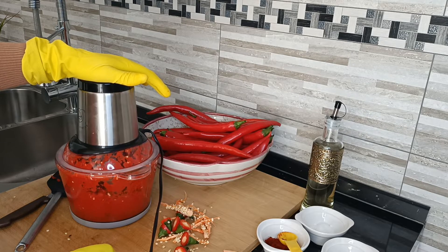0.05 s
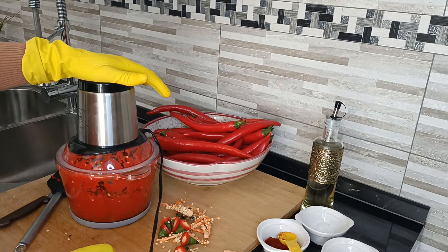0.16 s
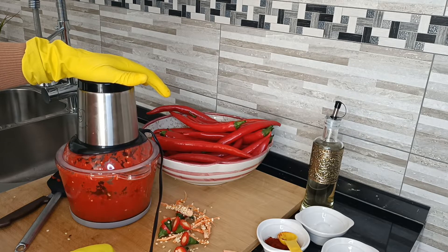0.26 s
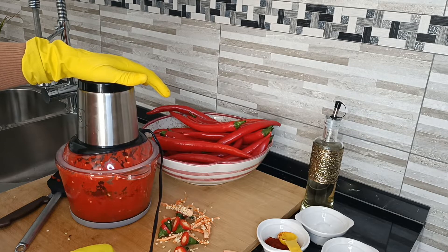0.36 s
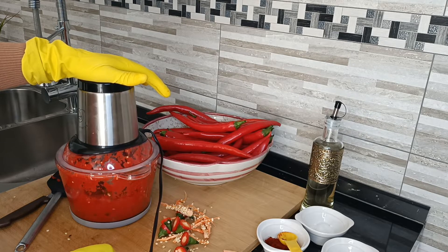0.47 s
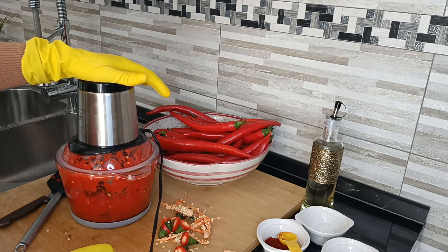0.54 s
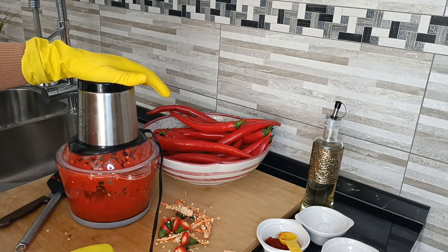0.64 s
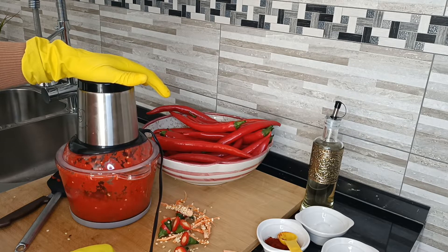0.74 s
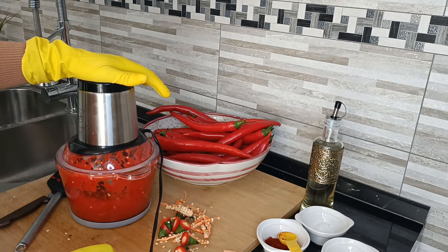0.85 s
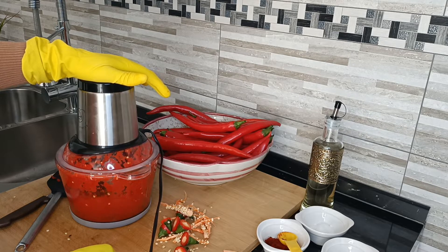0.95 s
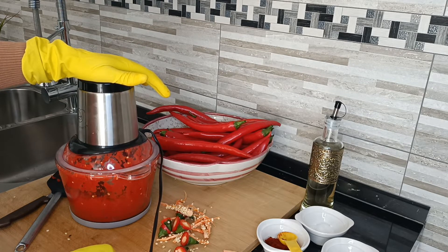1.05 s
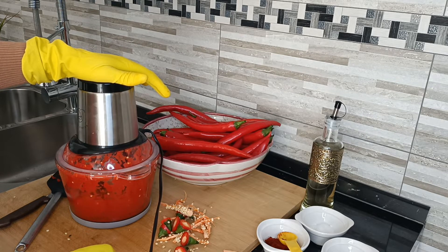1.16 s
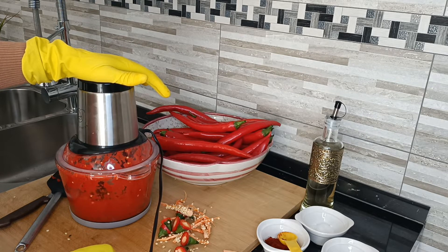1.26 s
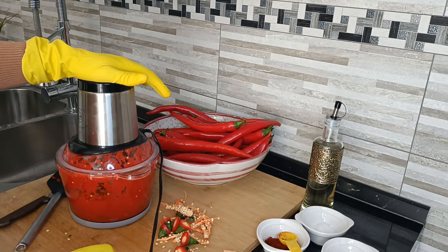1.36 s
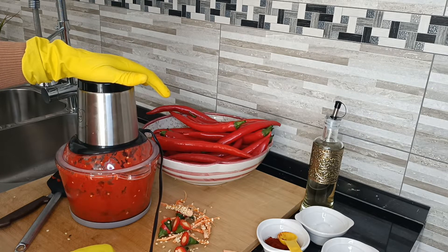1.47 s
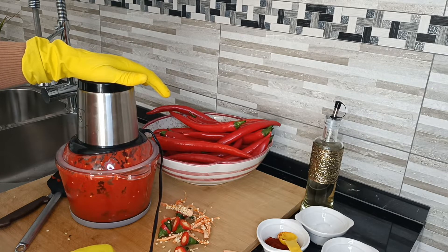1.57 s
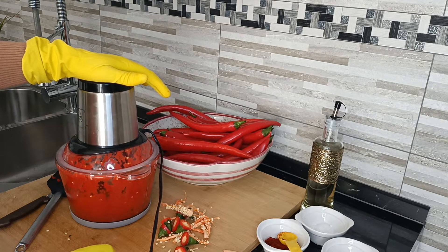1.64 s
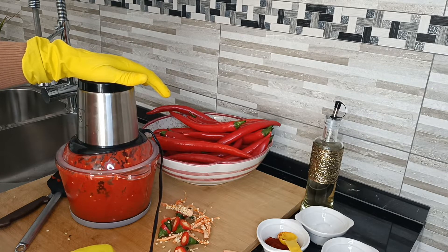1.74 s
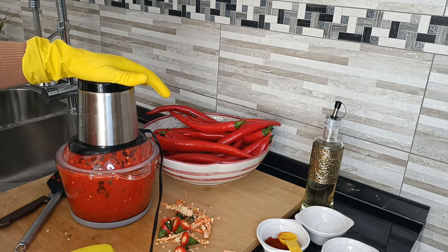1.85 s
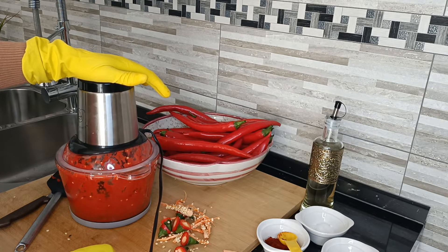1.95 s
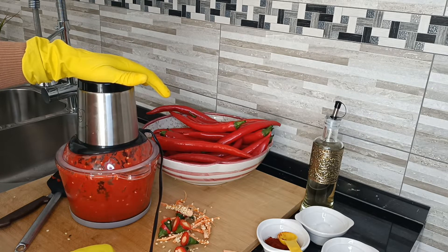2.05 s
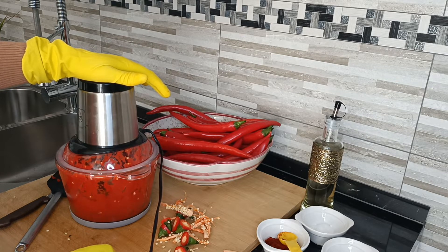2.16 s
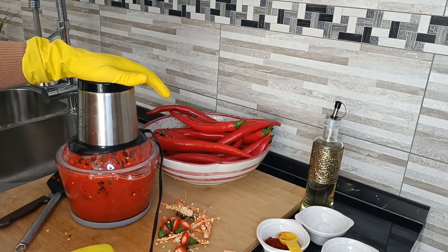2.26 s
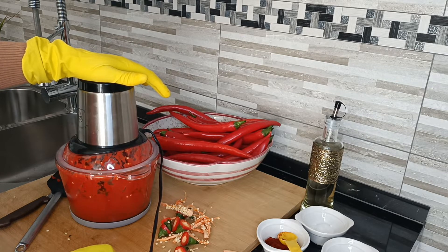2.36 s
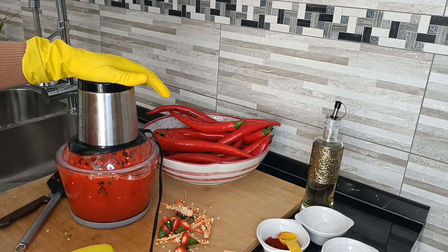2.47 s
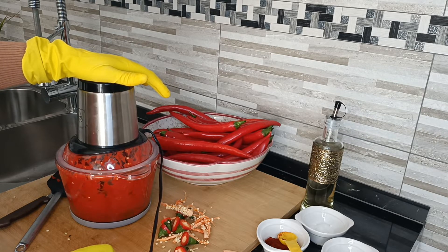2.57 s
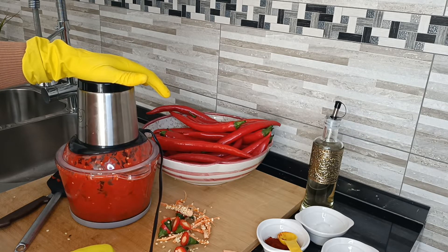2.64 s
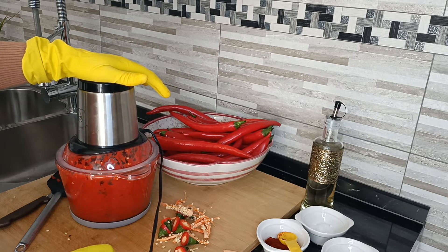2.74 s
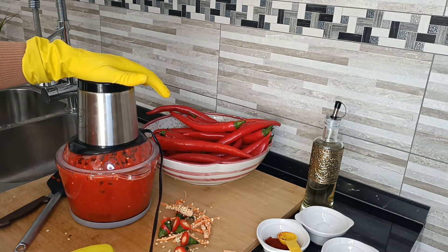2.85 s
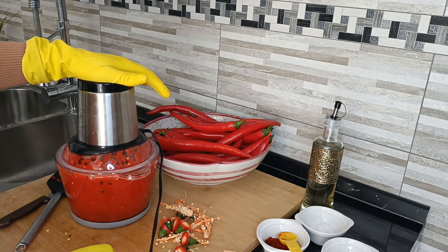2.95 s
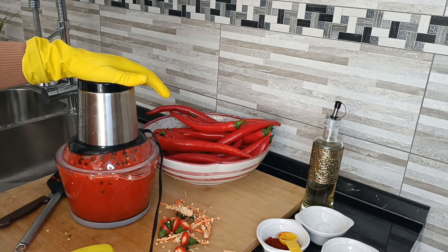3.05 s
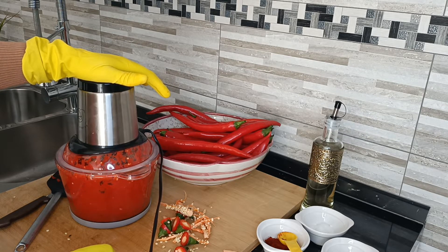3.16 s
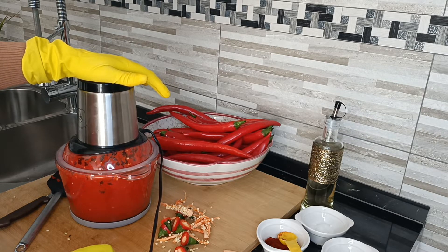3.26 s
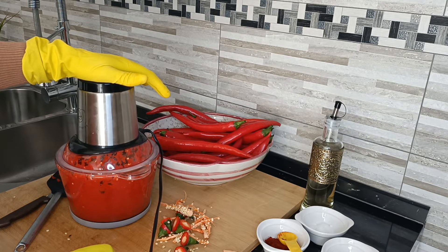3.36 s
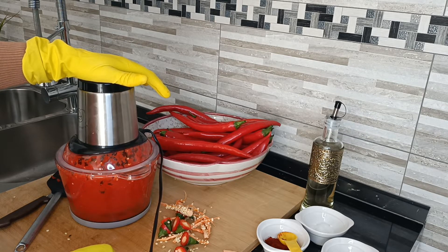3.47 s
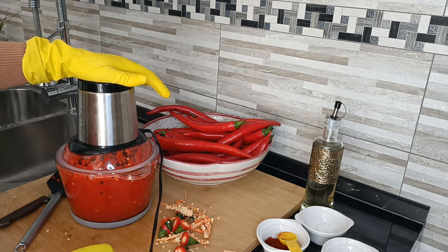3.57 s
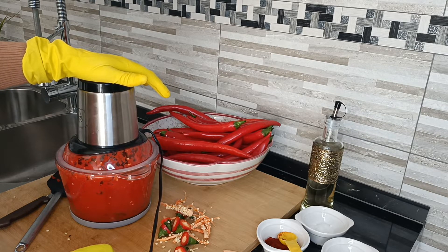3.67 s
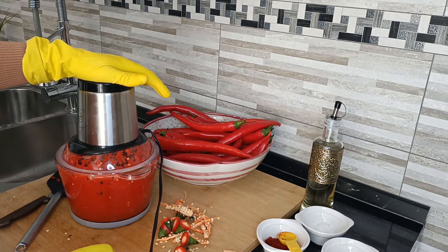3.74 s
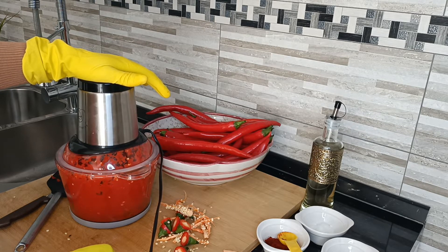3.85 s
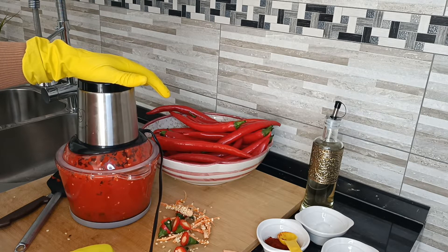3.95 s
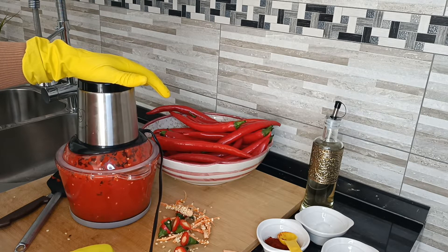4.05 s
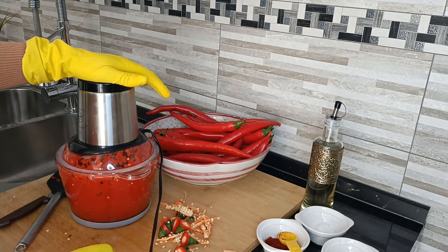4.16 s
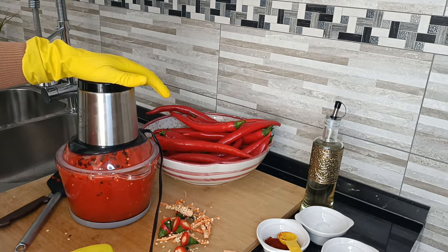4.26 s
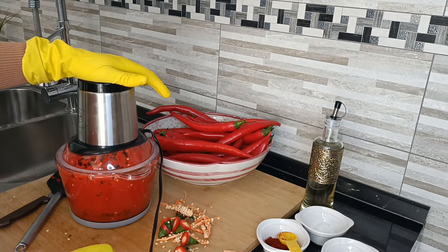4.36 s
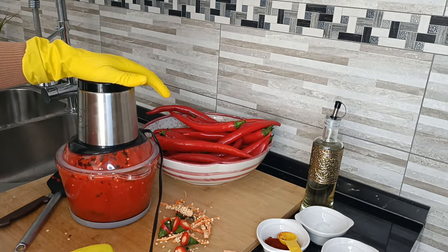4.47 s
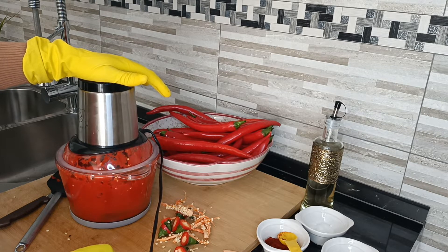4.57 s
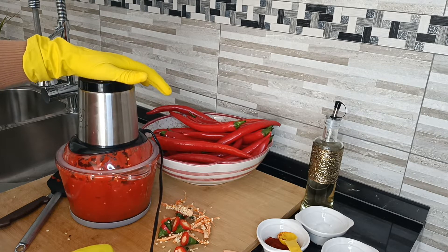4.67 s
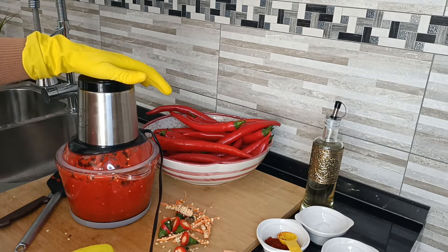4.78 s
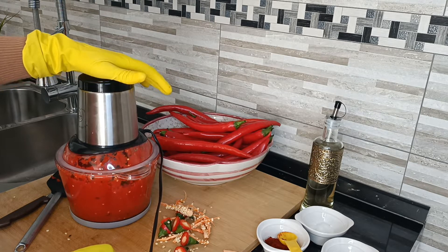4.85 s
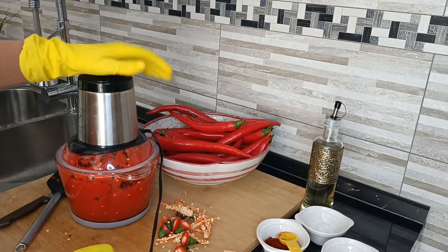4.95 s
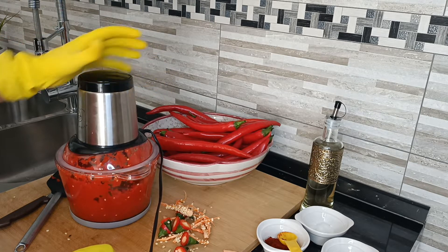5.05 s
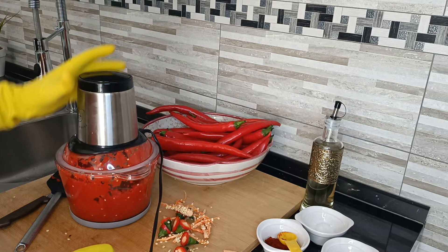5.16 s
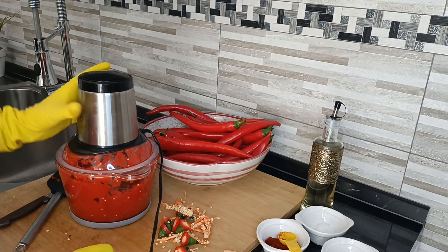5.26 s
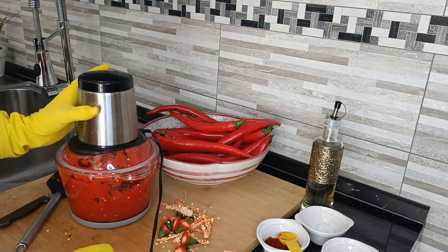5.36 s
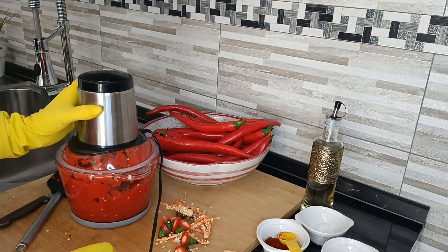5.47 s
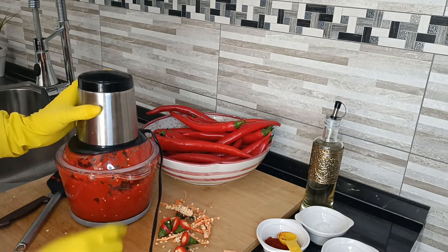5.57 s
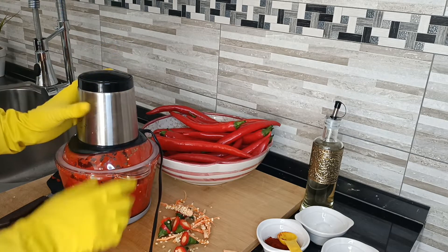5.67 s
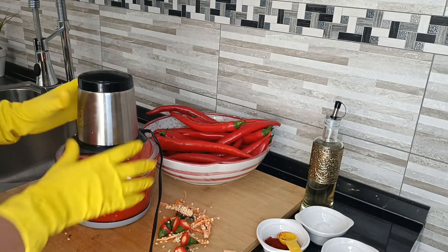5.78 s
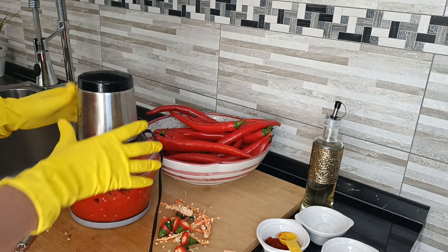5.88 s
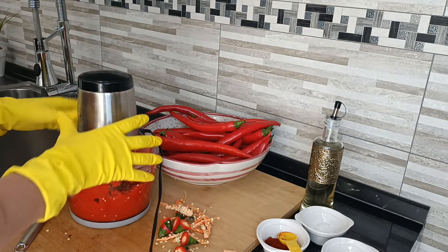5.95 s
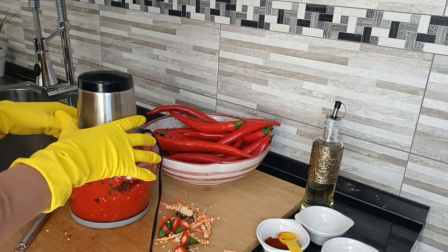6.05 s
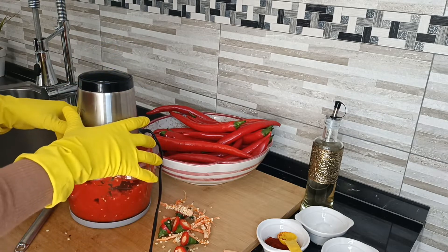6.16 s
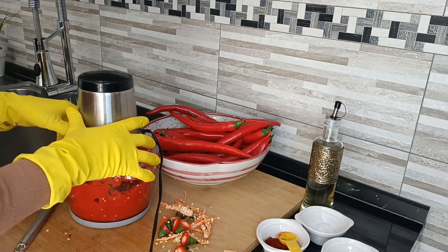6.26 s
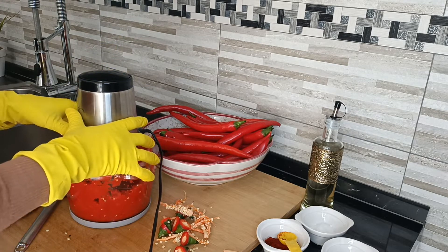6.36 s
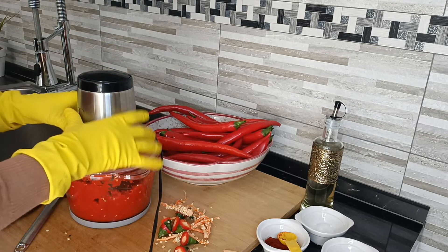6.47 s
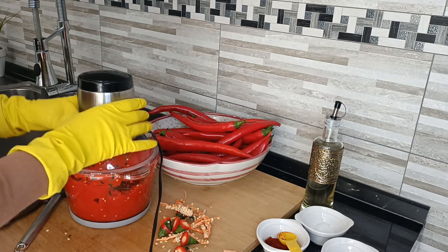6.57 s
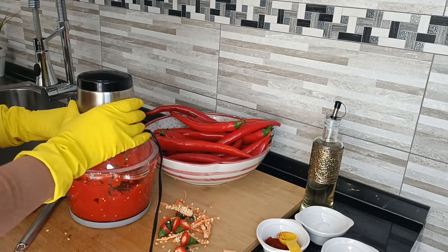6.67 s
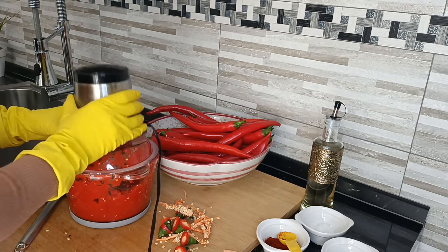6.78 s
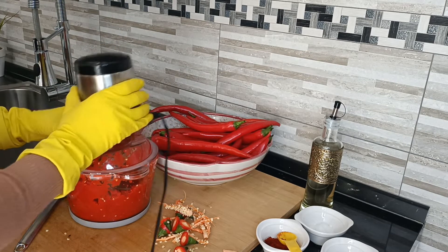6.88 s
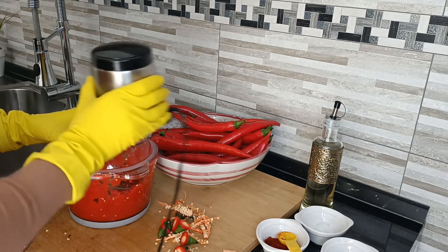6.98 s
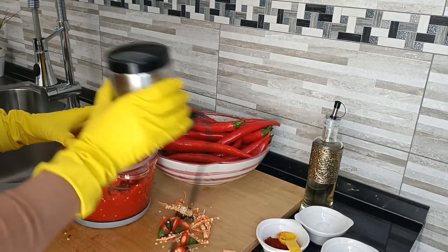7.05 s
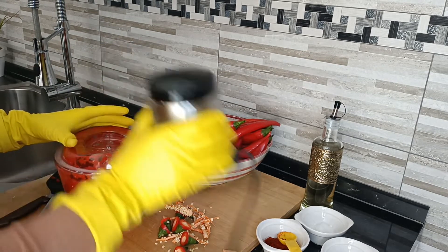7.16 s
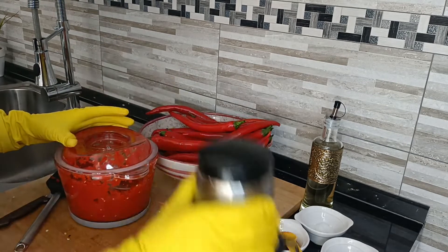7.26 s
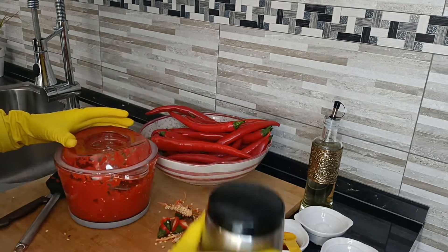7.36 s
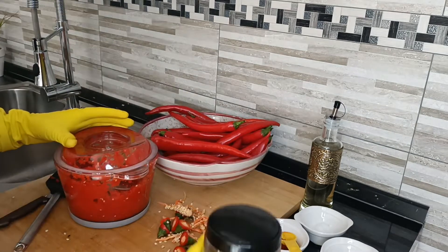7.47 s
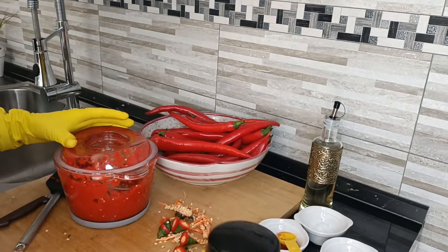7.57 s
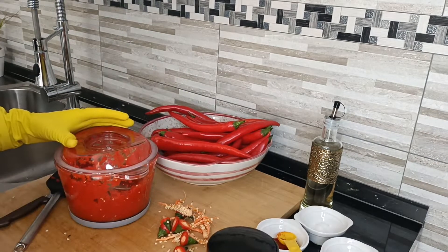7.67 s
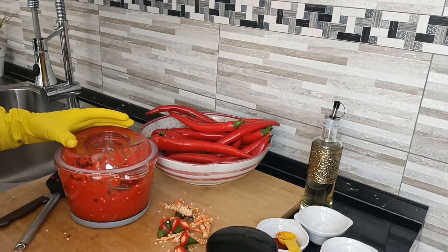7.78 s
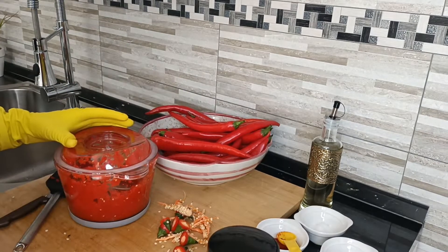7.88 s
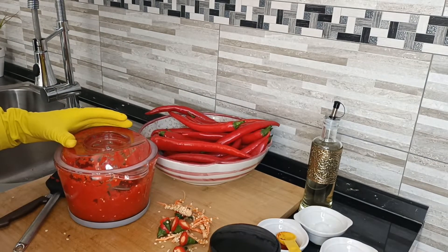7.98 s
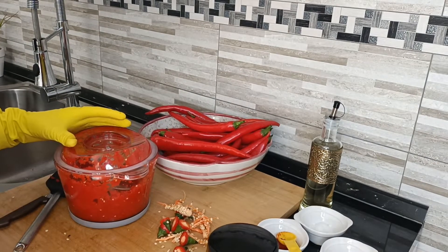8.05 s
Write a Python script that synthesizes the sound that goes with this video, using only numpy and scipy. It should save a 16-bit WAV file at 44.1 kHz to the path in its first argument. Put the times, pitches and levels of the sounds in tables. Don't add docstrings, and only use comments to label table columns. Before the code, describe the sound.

A small electric chopper whines harshly over rough hiss, winds down in pitch, then its motor head clicks free and clacks loudly onto a wooden board.

```python
import sys
import numpy as np
from scipy import signal
from scipy.fft import rfft, irfft, next_fast_len
from scipy.io import wavfile

SR = 44100
rng = np.random.default_rng(int(sys.argv[2]) if len(sys.argv) > 2 else 0)


def bounce(signal):
    frames = np.transpose(np.atleast_2d(signal))
    limited = np.clip(frames, -1, 1)
    pcm = np.round(limited * 32767).astype(np.int16)
    wavfile.write(sys.argv[1], SR, pcm)


def linear_from_db(decibels):
    return 10 ** (np.asarray(decibels, float) / 20)


N = 358091
TIME = np.arange(N) / SR

# (time [s], pitch [Hz])
TOOTH_PITCH = [(0, 2555), (.45, 2582), (1.6, 2582), (1.95, 2564), (2.6, 2578), (3.8, 2588), (4.15, 2632),
               (4.6, 2648)]
TEETH = 20
TONE_MULTIPLES = [1, 2, 16.17, 17, 20, 21, 20.5, 30, 40, 41, 42, 43, 41.4, 61.5, 82.5]
# (level [dB], blur [Hz], unsteady share [0-1])
TONES = [(-36, 36, 0.76), (-39, 14, 0.91), (-23.5, 20, 0.8), (-25, 18, 0.38), (-13, 19, 0.52),
         (-17, 27, 0.44), (-20, 420, 0.94), (-27.5, 23, 0.52), (-27, 45, 0.96), (-6.5, 47, 0.62),
         (-12.5, 42, 0.31), (-10.5, 120, 1), (-3.5, 380, 1), (-20, 76, 0.8), (-15, 300, 1)]
# (frequency [Hz], level [dB])
CASING = [(100, 0), (400, 0), (900, -4), (1600, -4), (2150, 0), (2400, -3), (2620, 0), (2950, -6),
          (3700, -7), (3900, 0), (4800, -2), (5300, 0), (12000, 0)]
# (time [s], length [s], level [dB])
SURGES = [
    (3.15, .05, 2),
    (4.295, 0.01, 7.5),
    (4.5, .04, 4.5),
    (4.62, 0.042, 3.5),
]
# (frequency [Hz], level per Hz [dB])
HISS = [(15, -34), (60, -17), (145, -12), (220, -21), (826, -23), (919, -23.5), (1270, -20.5), (2630, -8.5),
        (3440, -12), (4750, -10.5), (5430, -5), (7300, -12.5), (8130, -7), (11500, -13.5), (15500, -19.5)]
HOUSING_HZ = [300, 436, 942, 1432, 1900, 2137, 2408, 2580, 2695, 2947, 5011, 5550, 5841, 6198, 6531]
# (width [Hz], level [dB])
HOUSING = [(20, -5), (40, -2.5), (60, 1.5), (46.296, -1), (30, 0), (30, -6.5), (29.7, -20), (20, -33),
           (30.1, -33), (37.037, -3), (50.3, -8), (40, -20), (39.8, 8), (75, -0.5), (40, -32)]

SWITCH_OFF_S, DRAG_S, FRICTION_HZ, CRAWL_HZ = 4.735, 0.41, 1020, 300
HISS_DB, COAST_HISS_DB, SETTLES_S, SETTLE_DB_PER_S, STILL_S = -21, -4, 5.01, 110, 5.3
COAST_WHINE_DB, COAST_TEETH_DB, COAST_UNSTEADY = 4, 1.5, 0.7

# (frequency [Hz], level [dB], time to fall 60 dB [s])
LID = [(422, 4, 0.063), (602, 8.5, 0.037), (780, -16, 0.04), (1850, 7, 0.041), (2070, 14, 0.016),
       (2580, 16, 0.014), (2900, 10, .02), (4300, 3, .015)]
# (frequency [Hz], level [dB], time to fall 60 dB [s])
BOARD = [(292, 5, 0.2), (490, 2.5, 0.073), (640, 1, 0.086), (1010, -10, 0.018), (1167, 10, 0.018),
         (1440, 10.5, 0.018), (1775, 6, 0.024), (2200, 9.5, 0.0099), (2430, -1, 0.021), (3020, -10, 0.023),
         (4280, -23, .012)]
# (time [s], peak [dB], crack centre [Hz], thud under peak [dB])
TOUCHES = [
    (5.809, -53, 3500, -16),
    (6.377, -57, 510, -11),
    (6.429, -61, 1410, -16),
    (6.529, -56, 450, -16),
    (6.646, -50.5, 1670, -8),
    (6.774, -35.5, 6440, -22),
    (6.784, -52, 425, 6),
    (6.875, -53, 576, -11),
    (6.899, -51, 557, -23),
]
# (time [s], peak [dB], crack centre [Hz], thud under peak [dB])
CLACKS = [
    (5.859, -49.5, 2900, -32),
    (5.889, -49.5, 2780, -32),
    (6.72, -51, 571, 4.5),
    (6.825, -32.5, 566, -10.5),
    (6.8259, -32.5, 2200, -17),
]
# (time [s], peak [dB], pitch [Hz], thud under peak [dB])
RUBS = [
    (7.294, -48, 1440, -5),
    (7.328, -42.5, 1440, -10),
    (7.352, -47.5, 640, 6),
    (7.628, -44.5, 490, -12),
]
# (time [s], peak [dB], crack centre [Hz], thud under peak [dB])
SLIDES = [
    (7.33, -31.5, 5500, -32),
    (7.409, -13.5, 2500, -26),
    (7.439, -20.5, 1570, -22),
    (7.519, -28, 1160, -24),
]
# (time [s], peak [dB], crack centre [Hz], thud under peak [dB])
TAPS = [
    (7.393, -4, 1180, -19),
    (7.487, -19.5, 890, -14),
    (7.732, -17, 1860, -8.5),
    (7.741, -22.5, 990, -6),
    (8.084, -45, 540, -5),
    (8.109, -43, 520, -8),
]
# (time [s], peak [dB], crack centre [Hz], thud under peak [dB])
TICKS = [
    (7.674, -29, 2460, -23),
    (7.785, -21.5, 2050, -14.5),
    (8.009, -43, 1900, -15),
]
# (time [s], length [s], level [dB])
GLOVES = [
    (5.81, 0.12, -54.5),
    (6.45, 0.14, -72),
    (6.75, 0.21, -62),
]
GLOVES_IDLE_DB, GLOVES_FROM_S = -76, 6.3

# (frequency [Hz], time to fall 60 dB [s])
KITCHEN = [(150, 0.51), (700, 0.46), (3000, 0.44), (10000, 0.15)]
LEFT_LAG = 8
# (frequency [Hz], level per Hz [dB])
AIR = [(15, -28), (25, 12.5), (79, 2), (582, -18), (741, -12.5), (2500, -19), (3340, -15.5), (6050, -12.5),
       (7500, -18), (15500, -12.5)]
# (frequency [Hz], width [Hz], level [dB])
AIR_RINGS = [(1429, 130, -2), (3370, 160, 5), (5880, 220, 7), (8320, 550, 13.5), (11040, 580, 9),
             (13200, 240, -13), (15900, 300, 5)]
AIR_DB, DUCK_DB, RECOVER_S = -55.5, -4.5, 0.44
# (frequency [Hz], left level [dB], right level [dB])
PORTS = [(60, 1.2, -1.5), (670, 4.5, 5.5), (2570, 5, 3), (4890, 6, 3.5), (5260, 5.5, 7), (5510, 3.5, -8),
         (6320, 8.5, -1), (6980, 8.5, -2), (7940, -4, 5), (8800, -10.5, 1.5), (10000, 2.5, 0),
         (11780, -9, 0), (12620, 4, -9), (15200, 9, -17), (16500, -43, -27)]


def motor():
    driven_hz = curve(TOOTH_PITCH)[0]
    off_s = np.maximum(TIME - SWITCH_OFF_S, 0)
    coasting_hz = (driven_hz + FRICTION_HZ) * np.exp(-off_s / DRAG_S) - FRICTION_HZ
    turns_hz = np.maximum(coasting_hz, CRAWL_HZ) / TEETH
    speed = turns_hz / turns_hz[0]
    free = np.clip(off_s / 0.04, 0, 1)
    wobble = 1 + 0.002457 * drift(7.97).real
    angle = 2 * np.pi * np.cumsum(turns_hz * wobble) / SR

    whine = gear_whine(angle, free)
    whine = shaped(whine, colour(CASING)) * speed ** 1.4
    shape, surge_db = swells(SURGES)
    whine_db = np.sum(shape * surge_db, axis=0) + COAST_WHINE_DB * free
    hiss = brush_and_puree_hiss(angle, speed)
    hiss_db = HISS_DB + COAST_HISS_DB * np.clip(off_s / 0.2, 0, 1)
    hiss_db = hiss_db - SETTLE_DB_PER_S * np.maximum(TIME - SETTLES_S, 0)

    running = np.clip((STILL_S - TIME) / 0.035, 0, 1)
    return running * linear_from_db(hiss_db) * (hiss + linear_from_db(whine_db + 1.1 * drift(4.0).real) * whine)


def gear_whine(angle, free):
    whine = 0
    on = slice(0, int(STILL_S * SR))
    for multiple, (db, blur_hz, share) in zip(TONE_MULTIPLES, TONES):
        share = np.clip(share, 0, 1) * (1 - (1 - COAST_UNSTEADY) * free[on])
        shake = np.array([drift(blur_hz / 2)[on], drift(blur_hz / 2)[on]])
        shake[1] = 0.89 * shake[1] - 0.5 * shake[0] if multiple > 5 else shake[0]
        db = db + COAST_TEETH_DB * free[on] * (multiple < 25)
        strength = np.sqrt(1 - share) + np.sqrt(share) * shake
        whine = whine + linear_from_db(db) * np.real(strength * np.exp(1j * multiple * angle[on]))
    return np.pad(whine, [(0, 0), (0, N - on.stop)])


def brush_and_puree_hiss(angle, speed):
    throb = 1 + 0.05 * np.cos(angle)
    grit = pair(N, 1070.0, spread=0.85) * throb * linear_from_db(0.87 * drift(44.0).real)
    rings = [(hz, *ring) for hz, ring in zip(HOUSING_HZ, HOUSING)]
    hiss = linear_from_db(-3) * unit(shaped(grit, colour(HISS, rings)))
    slosh = shaped(hiss, lambda f: 1 / (1 + (f / 1800) ** 4) / (1 + (200 / f) ** 4))
    brush = shaped(hiss, lambda f: 1 / (1 + (3500 / f) ** 2))
    return hiss + slosh * (speed ** -0.5 - 1) + brush * (speed ** 1.14 - 1)


def hands():
    lid = dict(thud_hz=154, thud_t60=0.25)
    board = dict(thud_hz=124, thud_t60=0.24)
    return (knocks(TOUCHES, LID, drag=0.011, ring_db=-11, focus_db=15, **lid)
            + knocks(CLACKS, LID, drag=0.0082, ring_db=1.5, focus_db=7.5, **lid)
            + knocks(RUBS, BOARD, drag=0.022, ring_db=9.5, focus_db=18, **board)
            + knocks(SLIDES, BOARD, drag=0.029, ring_db=-7, focus_db=9, **board)
            + knocks(TAPS, BOARD, drag=0.0043, ring_db=-2, focus_db=3.5, **board)
            + knocks(TICKS, BOARD, drag=0.0012, ring_db=-3.5, focus_db=9, **board)
            + gloves())


def knocks(events, modes, drag, ring_db, focus_db, thud_hz, thud_t60):
    out = np.zeros(N + SR)
    t = np.arange(SR // 3) / SR
    size = len(t)
    chance = rng.standard_normal((len(events), 2 * size + 2 * len(modes)))
    thud_edges = thud_hz / 1.8, thud_hz * 1.9
    for (s, db, crack_hz, thud_db), c in zip(events, chance):
        scrape = c[:size] * np.exp(-t / max(drag, 0.0005))
        edges = crack_hz / 1.62, min(crack_hz * 1.64, 16000)
        crack = band(band(scrape, *edges), *edges)
        crack = crack + linear_from_db(1.0 + 0.46 * db) * band(scrape, 1700, 6300)

        body = 0
        for k, (f, mode_db, t60) in enumerate(modes):
            level_db = mode_db + 2 * c[-1 - 2 * k] - focus_db * abs(np.log2(f / crack_hz))
            mode_hz = f * (1 + c[-2 - 2 * k] / 50)
            body = body + linear_from_db(level_db) * np.sin(2 * np.pi * mode_hz * t) * linear_from_db(-60 * t / t60)
        ring = signal.fftconvolve(body, scrape[:SR // 10])[:size]

        shudder = band(band(c[size:2 * size], *thud_edges), *thud_edges)
        thud = shudder * (1 - np.exp(-t / 0.006)) * linear_from_db(-60 * t / thud_t60)
        knock = peak(crack) + linear_from_db(ring_db) * peak(ring) + linear_from_db(thud_db + 4) * peak(thud)
        i = int(s * SR)
        out[i:i + size] += linear_from_db(db) * knock
    return out[:N]


def gloves():
    snaps = (rng.random(N) < 600 / SR) * rng.standard_normal(N)
    snaps = snaps * linear_from_db(2.2 * np.minimum(rng.exponential(size=N), 3))
    shape, db = swells(GLOVES)
    busy = np.sum(shape * linear_from_db(db), axis=0) + linear_from_db(GLOVES_IDLE_DB) * (TIME > GLOVES_FROM_S)
    rubber = colour([(300, -7), (1000, -16), (2600, -4.0), (6000, -7), (11000, -3.0), (14000, 0.0)])
    return busy * unit(shaped(snaps, rubber))


def kitchen(x, lag, direct_db, wet_db):
    t = np.arange(int(0.8 * SR)) / SR
    centres = np.log([f for f, _ in KITCHEN])
    noise = pair(len(t), 590.0)
    tail = 0
    for k, (_, t60) in enumerate(KITCHEN):
        part = shaped(noise, lambda f: np.interp(np.log(f), centres, np.arange(len(centres)) == k))
        tail = tail + part * linear_from_db(-60 * t / t60) / np.sqrt(t60 * SR / 14)
    tail = tail * np.clip(t / 0.007, 0, 1)
    direct = np.array([np.roll(x[0], lag), x[-1]])
    return linear_from_db(direct_db) * direct + linear_from_db(wet_db) * signal.fftconvolve(x, tail, axes=1)[:, :x.shape[1]]


def air():
    db = AIR_DB + DUCK_DB * np.exp(-np.maximum(TIME - STILL_S, 0) / RECOVER_S)
    return linear_from_db(db + drift(5.0).real) * unit(shaped(pair(N, 80.0), colour(AIR, AIR_RINGS)))


def curve(table, t=TIME):
    s, *columns = np.transpose(table)
    return [np.interp(t, s, c) for c in columns]


def swells(events):
    s, length, height = np.transpose(events)[:, :, None]
    return np.exp(-((TIME - s) / length) ** 2), height


def unit(x):
    return x / np.sqrt(np.mean(np.abs(x) ** 2))


def peak(x):
    return x / np.abs(x).max()


def band(x, low_hz, high_hz):
    return signal.sosfilt(signal.butter(1, [low_hz, high_hz], "band", fs=SR, output="sos"), x)


def shaped(x, gain):
    size = next_fast_len(x.shape[-1])
    hz = np.arange(size // 2 + 1) * SR / size + 0.0011
    return irfft(rfft(x, size) * gain(hz), size)[..., :x.shape[-1]]


def colour(table, rings=()):
    hz, db = np.transpose(table)

    def gain(f):
        bumps = sum(linear_from_db(d) / (1 + (2 * (f - c) / w) ** 2) for c, w, d in rings)
        return linear_from_db(np.interp(np.log(f), np.log(hz), db)) * (1 + bumps)

    return gain


def drift(width_hz):
    coarse = np.arange(0, N + 32, 16)
    f = np.fft.fftfreq(len(coarse), 16 / SR)
    noise = rng.standard_normal((2, len(f))).T @ [1, 1j]
    z = np.fft.ifft(noise / (1 + (f / width_hz) ** 2))
    return np.interp(np.arange(N), coarse, unit(z))


def pair(n, alike_hz, spread=1):
    mid, side = rng.standard_normal((2, n))
    side = shaped(side, lambda f: spread / np.sqrt(1 + (alike_hz / f) ** 2))
    return np.array([mid + side, mid - side]) / np.sqrt(2)


def scene():
    hum = motor()
    lead = SR // 2
    already_running = np.hstack([hum[:, lead:0:-1], hum])
    chopper = kitchen(already_running, LEFT_LAG, direct_db=-2.0, wet_db=-3.5)[:, lead:]
    handling = kitchen(hands()[None], lag=0, direct_db=-4.0, wet_db=-4.0)
    return chopper + handling + air()


def top_cut(x):
    return signal.sosfilt(signal.butter(12, 16580, fs=SR, output="sos"), x)


def record(dry):
    hz, left_db, right_db = np.transpose(PORTS)
    left = shaped(dry[0], colour(np.transpose([hz, left_db])))
    right = shaped(dry[1], colour(np.transpose([hz, right_db])))
    return top_cut(np.array([left, right]))


dry = scene()
out = record(dry)
bounce(out)
```